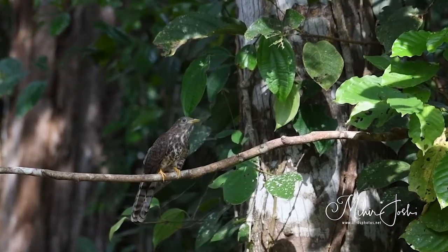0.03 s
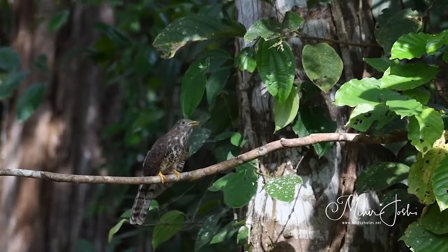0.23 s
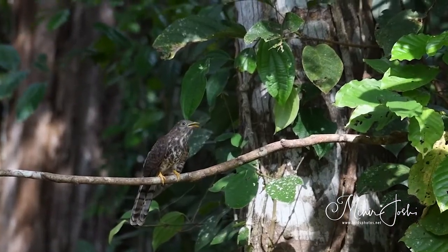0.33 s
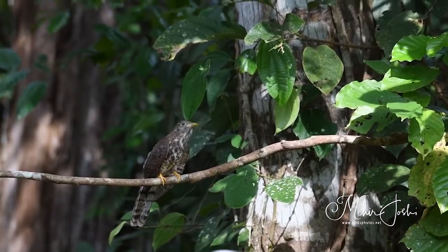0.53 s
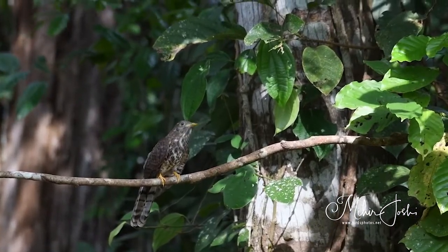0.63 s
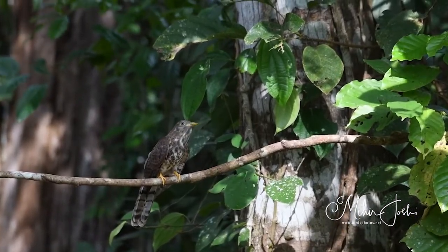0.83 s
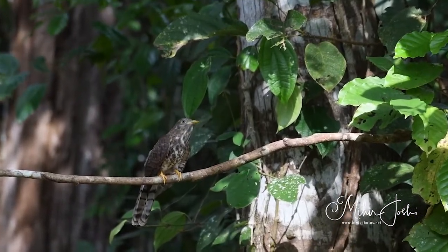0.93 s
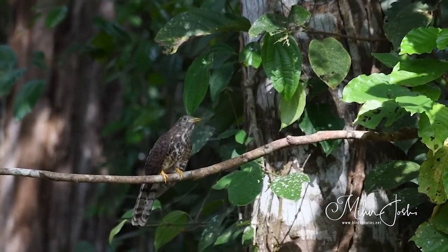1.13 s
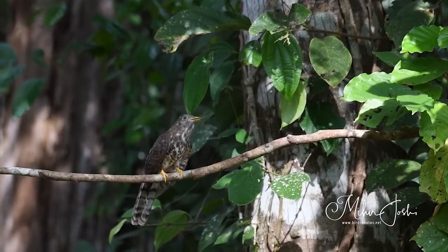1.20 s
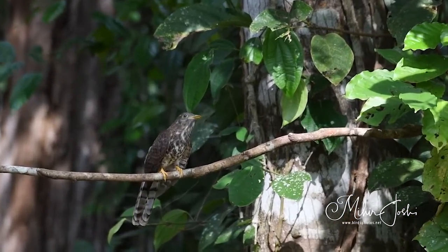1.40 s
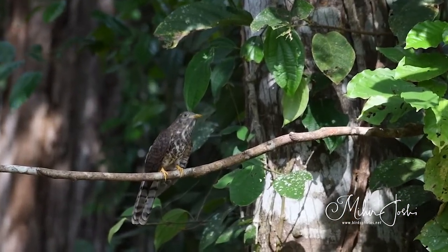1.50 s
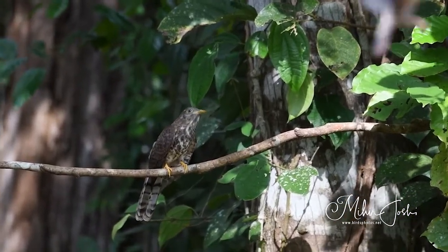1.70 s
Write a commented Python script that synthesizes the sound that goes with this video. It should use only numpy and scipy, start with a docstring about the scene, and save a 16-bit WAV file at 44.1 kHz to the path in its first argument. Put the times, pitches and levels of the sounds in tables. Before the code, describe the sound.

A bird scolds in harsh rattling rasps amid wing claps and squeals in echoing woodland

```python
"""Far chatter and a low coo open over faint rumble and hiss; then wings clatter as birds quarrel in woodland.
One bird scolds in rasps, rattles of falling chirps and noise puffs; another squeals twice, breaking hoarse.
A low trill and short whistles cut in as gliding tones, and a distant bird yelps in rough arched notes.
Feather claps, twig ticks and the air are coloured noise; the trees answer calls and wings with decaying noise.
"""
import sys
import numpy as np
from scipy import signal
from scipy.fft import rfft, irfft, next_fast_len
from scipy.io import wavfile
from scipy.ndimage import map_coordinates

SR = 44100
rng = np.random.default_rng(int(sys.argv[2]) if len(sys.argv) > 2 else 0)


def file_out(sig):
    """Save sig as 16-bit WAV at sys.argv[1]."""
    # one column per channel
    cols = np.atleast_2d(sig).T
    # limit, then scale
    lim = np.clip(cols, -1, 1)
    pcm = np.round(lim * 32767).astype(np.int16)
    wavfile.write(sys.argv[1], SR, pcm)


N = 77175
T = np.arange(N) / SR
SIDES = np.array([[0.5], [-0.5]])  # left, right


def amp(db):
    """Decibels to gain."""
    return 10 ** (np.asarray(db) / 20)


def unit(x):
    """Scale to rms 1."""
    return x / np.sqrt(np.mean(x ** 2) + 1e-20)


def along(points, hz):
    """Read a curve of (f/Hz, value) points on a log frequency axis."""
    f, value = np.transpose(points)
    return np.interp(np.log(hz + 1), np.log(f + 1), value)


def wobble(rate):
    """A smooth random curve through `rate` random knots a second."""
    knots = rng.standard_normal(int(N * rate / SR) + 4)
    return map_coordinates(knots, [T * rate])


def filtered(x, response):
    """Shape the spectrum of x by a response of frequency."""
    m = next_fast_len(N + SR // 2)
    spectrum = rfft(x, m) * response(np.fft.rfftfreq(m, 1 / SR))
    return irfft(spectrum, m)[..., :N]


def noise(colour):
    """Noise of rms 1, coloured by (f/Hz, level/dB) points."""
    white = rng.standard_normal(N)
    return unit(filtered(white, lambda hz: amp(along(colour, hz))))


def wide_noise(colour, side_db):
    """Stereo noise of rms 1: a middle plus a side signal of opposite sign left and right."""
    middle = noise(colour)
    side = amp(side_db) * noise(colour) * np.array([[1], [-1]])
    return unit(middle + side)


def level(rows):
    """Gain fader from the first (t/s) and last (level/dB) columns, silent outside."""
    rows = np.array(rows)
    t, db = rows[:, 0], rows[:, -1]
    return amp(np.interp(T, t, db)) * (T > t[0]) * (T < t[-1])


def pitch(rows):
    """Gliding pitch from the first two columns (t/s, f/Hz)."""
    return np.interp(T, *np.transpose(rows)[:2])


def gate(start, length, attack, release):
    """Smooth rise, hold and fall."""
    rise = (1 + np.tanh(2 * (T - start) / attack)) / 2
    fall = (1 - np.tanh(2 * (T - start - length) / release)) / 2
    return rise * fall


def swell(start, length, attack, release):
    """Exponential rise, hold and exponential fall."""
    before = np.minimum(T - start, 0)
    after = np.maximum(T - start - length, 0)
    return np.exp(before / attack - after / release)


def burst(start, rise, decay):
    """A sudden rise and an exponential fall."""
    t = np.maximum(T - start, 0)
    return (1 - np.exp(-t / rise)) * np.exp(-t / decay)


def voice(hz, partials_db):
    """Sum of sine harmonics riding on a moving pitch."""
    phase = 2 * np.pi * np.cumsum(hz) / SR
    return np.sqrt(2) * sum(amp(db) * np.sin(k * phase) for k, db in enumerate(partials_db, 1))


# Scolding rasps: first strong pulse [t/s], length [s], pulse rate [f/Hz], [level/dB]
RASPS = [(0.2153, 0.042, 70, -31.5), (0.331, 0.023, 74, -32.5), (.479, 0.032, 70, -32),
         (.663, 0.037, 77.5, -30.3), (0.825, 0.035, 71, -27), (0.994, 0.028, 74, -28)]
# Harmonics of the rasp, from the fundamental up [level/dB]
RASP_PARTIALS = [-28, 0.5, -34, -51, -23]
# Colour of hoarse breath, shared with squeals and whistles: [f/Hz], [level/dB]
HOARSE_NOISE = [(500, -27.5), (1300, -21.5), (1900, -8), (2400, -11), (3100, -1.5), (4400, 2), (5400, -3.5),
                (6400, -5), (7500, -12), (10500, -21), (12500, -29), (15000, -59)]
RASP_HZ, RASP_JITTER = 2107, 0.052  # pitch, and its roughness as a fraction
RATTLE_SAG = 0.11  # fraction of pitch lost through a pulse
RATTLE_SHARPNESS, RATTLE_FLOOR = 1.1, 0.39  # narrowness of a pulse, floor added under it
RASP_NOISE_DB, RASP_GRAIN_DB = -2.5, 2
RASP_ATTACK_S, RASP_RELEASE_S = 0.013, 0.018


def rasps():
    """Each rasp is a rattle of rough, falling chirps with a grainy puff of noise on each."""
    out = np.zeros(N)
    for start, length, rate, db in RASPS:
        # place in the pulse, -0.5 to 0.5, strongest at 0
        cycle = ((T - start) * rate + 0.017 * wobble(60) + 0.5) % 1 - 0.5
        pulse = RATTLE_FLOOR + np.exp(RATTLE_SHARPNESS * (np.cos(2 * np.pi * cycle) - 1))
        hz = RASP_HZ * (1 - RATTLE_SAG * cycle + RASP_JITTER * wobble(1500))
        chirps = pulse * voice(hz, RASP_PARTIALS)
        grain = unit(noise(HOARSE_NOISE) * amp(RASP_GRAIN_DB * wobble(700)))
        puffs = amp(RASP_NOISE_DB) * np.sqrt(pulse) * grain
        envelope = swell(start, length, RASP_ATTACK_S, RASP_RELEASE_S)
        out += amp(db) * envelope * unit(chirps + puffs)
    return out


# Glide of each squeal: [t/s], pitch [f/Hz], [level/dB]
SHORT_SQUEAL = [(.374, 1470, -47), (.388, 1494, -36), (.41, 1592, -41), (.432, 1665, -40.5),
                (.443, 1860, -46), (.455, 1780, -57)]
LONG_SQUEAL = [(1.08, 1405, -55), (1.148, 1417, -50.5), (1.22, 1455, -44.5), (1.28, 1480, -43.5),
               (1.328, 1560, -40), (1.348, 1648, -38.5), (1.362, 1852, -40), (1.392, 1805, -41.5),
               (1.43, 1800, -73)]
# Throat resonance of each squeal: [f/Hz], [level/dB]
SHORT_THROAT = [(1500, -8.5), (1850, -8.5), (3100, -7.5), (3600, -4), (4600, 1.5), (5300, -2), (6000, -11),
                (6600, 3.5), (7600, -14), (9800, -10.5), (13000, -36)]
LONG_THROAT = [(1410, -4), (1500, -16.5), (1850, -7.5), (2830, -10.5), (2950, -4), (3200, -9), (3600, -1.5),
               (4500, 1.5), (5800, -6), (6700, 2), (7300, -5), (9000, -13.5), (10500, -21.5), (13000, -37)]
SQUEAL_BREAK_HZ = 1716
SQUEAL_JITTER, BREAK_JITTER = 0.006, 0.04  # pitch roughness as a fraction: always, and added past the break
SQUEAL_NOISE_DB, SQUEAL_WAVER_DB = -15, 2.6


def squeal(rows, throat):
    """A nasal rising call: the throat weights eight harmonics, hoarse once the pitch breaks upward."""
    hz = pitch(rows)
    broken = 0.5 + 0.5 * np.tanh((hz - SQUEAL_BREAK_HZ) / 60)
    partials = [along(throat, k * hz) + SQUEAL_WAVER_DB * wobble(34.9) for k in range(1, 9)]
    jitter = SQUEAL_JITTER + BREAK_JITTER * broken
    tone = voice(hz * (1 + jitter * wobble(900)), partials)
    breath = amp(SQUEAL_NOISE_DB) * noise(HOARSE_NOISE)
    return level(rows) * (tone + breath)


# Trill notes: start [t/s], length [s], top pitch [f/Hz], bottom pitch [f/Hz], [level/dB]
TRILL = [(0.749, 0.019, 1355, 1186, -35), (0.779, 0.026, 1375, 1131, -32.5),
         (.822, .022, 1350, 1145, -31.3), (.865, 0.0226, 1330, 1157, -30.5), (.895, 0.041, 1245, 1150, -35)]
TRILL_CREST, TRILL_EDGE_S = 0.15, 0.017  # crest as a fraction of the note, fade in and out


def trill():
    """Quick, pure notes that each round a crest and slide down."""
    out = np.zeros(N)
    for start, length, top_hz, bottom_hz, db in TRILL:
        u = np.clip((T - start) / length, -0.5, 1.5)
        height = (1 + np.cos(np.pi * (u - TRILL_CREST))) / 2
        hz = bottom_hz + (top_hz - bottom_hz) * height
        out += amp(db) * gate(start, length, TRILL_EDGE_S, TRILL_EDGE_S) * voice(hz, [0])
    return out


# Glide of each whistle: [t/s], pitch [f/Hz], [level/dB]
WHISTLE = [(.888, 2720, -56), (.91, 2865, -34), (.925, 3012, -39), (.945, 3165, -28.5), (.96, 3216, -38.5),
           (.978, 3086, -28), (.992, 2900, -57)]
FAINT_WHISTLE = [(.745, 3380, -61), (.768, 3377, -44), (.795, 3420, -41.5), (.82, 3305, -41)]
# Harmonics at the top of the arch, from the fundamental up [level/dB]
WHISTLE_PARTIALS = [0, -15, -16]
WHISTLE_FADE_DB_PER_HZ = 0.2  # the overtones weaken below the top of the arch


def whistle(rows, jitter, noise_db):
    """A thin, wavering arch, more or less hoarse; its overtones bloom only at the top."""
    hz = pitch(rows)
    fade_db = WHISTLE_FADE_DB_PER_HZ * (hz.max() - hz)
    partials = [db - fade_db * (k > 0) for k, db in enumerate(WHISTLE_PARTIALS)]
    tone = voice(hz * (1 + jitter * wobble(900)), partials)
    breath = amp(noise_db) * noise(HOARSE_NOISE)
    return level(rows) * (tone + breath)


# Wing claps, before doubling: [t/s], [level/dB]
CLAPS = [(.1, -39.5), (0.1087, -31.5), (.125, -31.5), (0.1496, -28.5), (0.179, -33.5), (0.211, -34),
         (0.227, -38), (0.252, -32), (0.282, -37.5), (0.31, -35), (0.328, -41), (0.353, -31.5),
         (0.384, -45), (1.376, -40), (1.392, -37.5), (1.407, -40)]
# Feather rustle fader: [t/s], [level/dB]
RUSTLE = [(.095, -76), (.12, -68), (.17, -44.5), (.22, -38), (.3, -45), (.37, -43), (.41, -48),
          (.58, -50.5)]
# Colour of claps and rustle: [f/Hz], [level/dB]
FEATHERS = [(100, -14), (420, -13.5), (730, -8), (1000, -12), (1800, -0.5), (3000, -9.5), (4400, 1.5),
            (6600, 2.5), (8500, -3.5), (11000, -9), (13000, -20), (15500, -38)]
# Hollow throbs of the wing strokes: [t/s], [level/dB]
THROBS = [(.123, -46), (.149, -39.5), (.225, -49), (.25, -40), (.329, -43), (.352, -39.5)]
CLAP_RISE_S, CLAP_DECAY_S = 0.0008, 0.0058
THROB_HZ, THROB_RISE_S, THROB_DECAY_S = 725, 0.004, 0.0095


def wings():
    """Feathers clap and rustle as bursts and flutters of noise; strong strokes add a hollow, rough throb."""
    claps = 2 * sum(amp(db) * burst(start, CLAP_RISE_S, CLAP_DECAY_S) for start, db in CLAPS)
    rustle = level(RUSTLE) * amp(4.2 * wobble(121.0))
    feathers = (claps + rustle) * wide_noise(FEATHERS, side_db=-2.0)
    throbs = sum(amp(db) * burst(start, THROB_RISE_S, THROB_DECAY_S) for start, db in THROBS)
    return feathers + throbs * voice(THROB_HZ * (1 + 0.15 * wobble(420)), [0])


# Twig ticks, before doubling: [t/s], [level/dB], left over right [level/dB]
TICKS = [(0.5253, -33, 11.5), (.608, -42, 13.5), (0.941, -42, 4), (.955, -35.5, 7.5)]
# Colour of a snapping twig: [f/Hz], [level/dB]
TWIG = [(800, -26), (3000, -15), (6000, -2), (8000, 2), (10000, 7), (13000, -13), (16000, -34)]
TICK_RISE_S, TICK_DECAY_S = 0.00048, 0.0013


def ticks():
    """Dry, bright snaps of twigs: very short bursts of noise."""
    snaps = np.zeros((2, N))
    for start, db, pan_db in TICKS:
        snaps += 2 * amp(db + pan_db * SIDES) * burst(start, TICK_RISE_S, TICK_DECAY_S)
    return wide_noise(TWIG, side_db=5.5) * snaps


# Distant yelps: middle [t/s], [level/dB]
YELPS = [(.718, -55.5), (.916, -57.5), (1.096, -54), (1.262, -53.5), (1.415, -56.5), (1.567, -53),
         (1.715, -52.5)]
# Harmonics at the top of the arch, from the fundamental up [level/dB]
YELP_PARTIALS = [-7, 0, -18]
YELP_HZ, YELP_DROP, YELP_S = 745, 0.39, 0.064  # top pitch, fraction lost at the ends, length


def yelps():
    """Short, rough arched notes from far away; the overtones fade away from the top."""
    out = np.zeros(N)
    for middle, db in YELPS:
        u = np.clip(2 * (T - middle) / YELP_S, -1, 1)
        effort = np.cos(np.pi * u / 2) + 1e-9
        partials = [p + 13 * k * np.log(effort) for k, p in enumerate(YELP_PARTIALS)]
        hz = YELP_HZ * (1 - YELP_DROP * u ** 2 + 0.0511 * wobble(600))
        envelope = (1 - u ** 2) ** (1 / 4)
        roughness = unit(amp(4.3 * wobble(260)))
        out += amp(db) * envelope * roughness * voice(hz, partials)
    return out


# Faint slurred notes: start [t/s], length [s], start pitch [f/Hz], end pitch [f/Hz], [level/dB]
CHIRPS = [(0.261, 0.045, 1474, 1560, -46.5), (.36, 0.054, 1601, 1471, -45),
          (1.111, 0.0272, 2340, 1797, -53), (1.539, 0.017, 2070, 1750, -55)]
# Far low coo: [t/s], pitch [f/Hz], [level/dB]
COO = [(.02, 341, -72), (.045, 329.5, -60.5), (.115, 291, -63), (.15, 281, -64)]


def far_calls():
    """Faint slurred notes of other birds and one low coo, all gliding sines."""
    out = level(COO) * voice(pitch(COO) * (1 + 0.065 * wobble(82)), [0])
    for start, length, start_hz, end_hz, db in CHIRPS:
        hz = np.interp(T, [start, start + length], [start_hz, end_hz])
        out += amp(db) * gate(start, length, 0.0056, 0.0071) * voice(hz, [0])
    return out


# Colours of the rumble and the leaf hiss: [f/Hz], [level/dB]
RUMBLE = [(20, -11), (54, 0), (97, 0.5), (200, -5.5), (310, -6), (450, -19), (900, -13.5), (2000, -120)]
HISS = [(150, -49), (420, -5.5), (680, -6), (1050, -5.5), (1600, -8.5), (2400, -17.5), (4200, -8),
        (6300, -9.5), (7400, -13.5), (10300, -11.5), (12000, -21.5), (15500, -25.5)]
# Far chatter fader: [t/s], [level/dB]
CHATTER = [(0, -46), (.035, -40), (.09, -51.5), (.22, -38.5), (.37, -43), (.42, -50.5), (.55, -49),
           (.62, -49.5), (1.1, -54), (1.45, -57.5), (1.6, -60.5)]
# Colour of the chatter: [f/Hz], [level/dB]
CHATTER_COLOUR = [(400, -22.5), (1000, -4.5), (1900, 0.5), (2500, 1), (3600, 1), (5000, -15.5),
                  (6500, -10.5), (9000, -16), (15000, -47)]
RUMBLE_DB, HISS_DB = -59.5, -55.5


def background():
    """Low rumble, leaf hiss and a wash of far chatter, all coloured noise."""
    rumble = amp(RUMBLE_DB) * wide_noise(RUMBLE, side_db=-8.5)
    hiss = amp(HISS_DB) * wide_noise(HISS, side_db=-1.5)
    flutter = amp(1.1 * wobble(50.4))
    chatter = level(CHATTER) * flutter * wide_noise(CHATTER_COLOUR, side_db=-1.5)
    return rumble + hiss + chatter


# Ring of the trees: [f/Hz], time to fall 60 dB [s]
WOODS = [(300, 0.38), (1200, 0.75), (3000, 0.5), (6000, 0.64), (12000, 0.5)]
LEFT_LEAD_S = 0.00002


def woods(x, near_db, tail_db, pan_db=0, near_s=0.16):
    """Direct sound, quick scatter from nearby leaves and trunks, and the long answer of the trees."""
    hz, t, z = signal.stft(rng.standard_normal((2, SR)), SR, nperseg=256)
    tail_fade = amp(-60 * t / along(WOODS, hz)[:, None])
    tail = signal.istft(z * tail_fade, SR, nperseg=256)[1][:, :SR]
    near = rng.standard_normal((2, SR)) * amp(-60 * np.arange(SR) / SR / near_s)
    answer = amp(tail_db) * tail / np.linalg.norm(tail[0])
    answer += amp(near_db) * near / np.linalg.norm(near[0])
    # positive pan is louder on the left
    direct = filtered(x, lambda f: amp(pan_db * SIDES) * np.exp(2j * np.pi * f * LEFT_LEAD_S * SIDES))
    return direct + signal.fftconvolve(np.atleast_2d(x), answer, axes=1)[:, :N]


def scene():
    """Mix every bird at its own depth among the trees, with dry ticks and background."""
    squeals = squeal(SHORT_SQUEAL, SHORT_THROAT) + squeal(LONG_SQUEAL, LONG_THROAT)
    whistles = whistle(WHISTLE, jitter=0.0156, noise_db=-13.5)
    whistles += whistle(FAINT_WHISTLE, jitter=0.043, noise_db=-1.0)
    return (woods(rasps(), near_db=-5.5, tail_db=-6.5, pan_db=1.5)
            + woods(squeals, near_db=-6, tail_db=-4.5)
            + woods(trill(), near_db=-14, tail_db=-3.0, pan_db=-1.5)
            + woods(whistles, near_db=-5.5, tail_db=-6.0, pan_db=3.5)
            + woods(wings(), near_db=-8.0, tail_db=-14.0, pan_db=-1.5)
            + ticks()
            + woods(yelps() + far_calls(), near_db=-4, tail_db=-10)
            + background())


# Narrow dips in the spectrum: centre [f/Hz], width [f/Hz]
NOTCHES = [(2610, 334), (7750, 775)]
TOP_HZ = 15780


def record(dry):
    """Two narrow notches and a sharp band limit."""
    def response(f):
        """Each notch is a Gaussian dip in gain; nothing passes from TOP_HZ up."""
        gain = 1.0 * (f < TOP_HZ)
        for hz, width in NOTCHES:
            gain *= 1 - 0.88 * np.exp(-((f - hz) / (width / 2)) ** 2)
        return gain
    return filtered(dry, response)


dry = scene()
out = record(dry)
file_out(out)
```